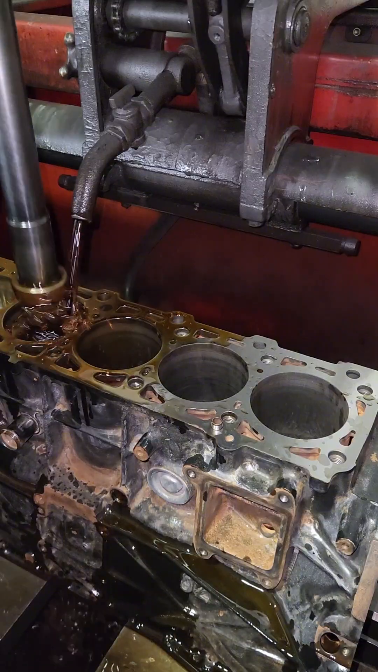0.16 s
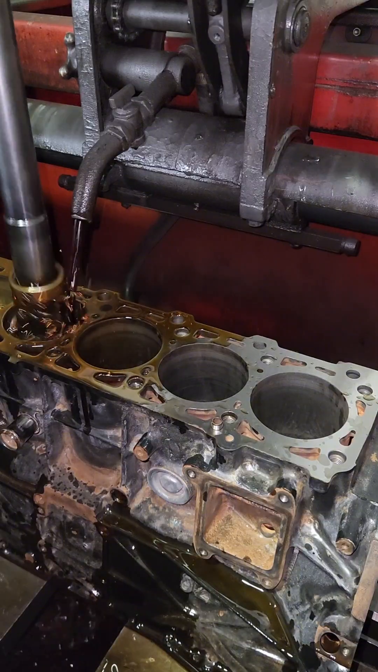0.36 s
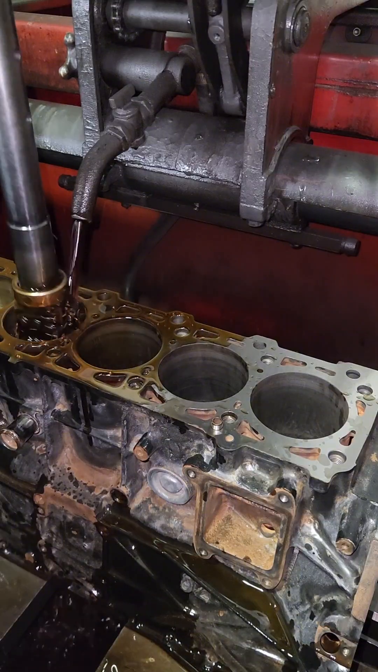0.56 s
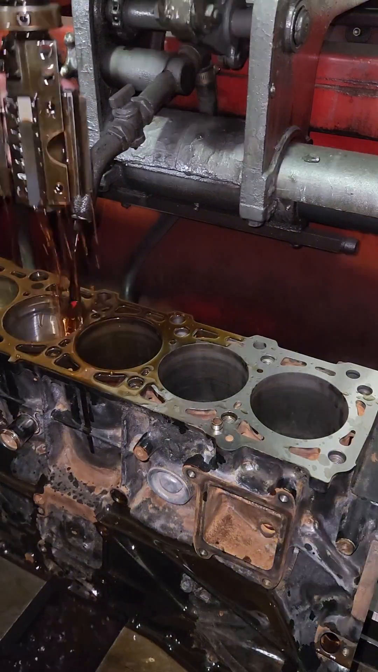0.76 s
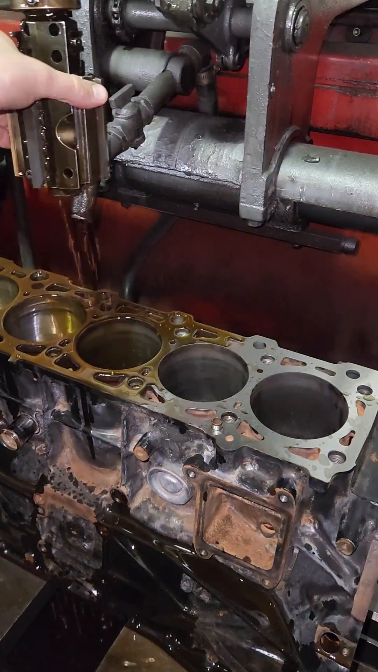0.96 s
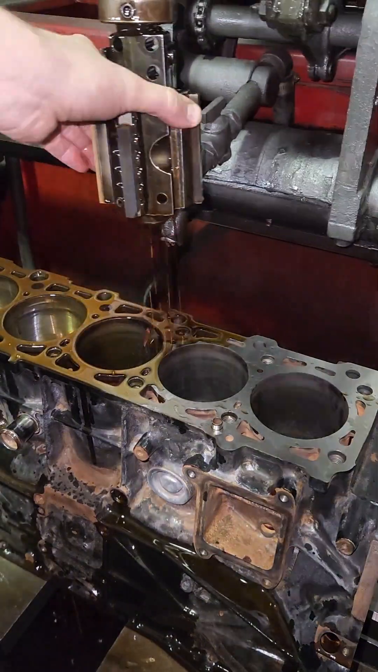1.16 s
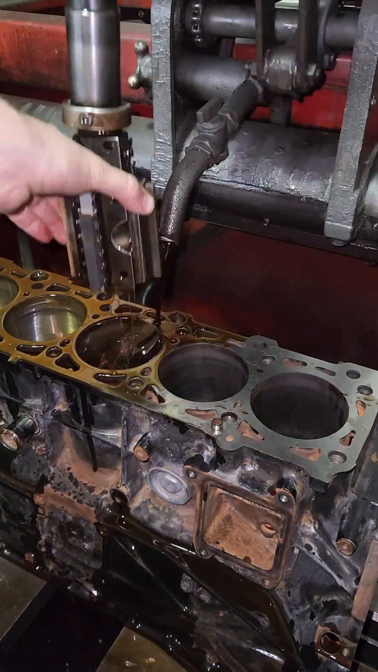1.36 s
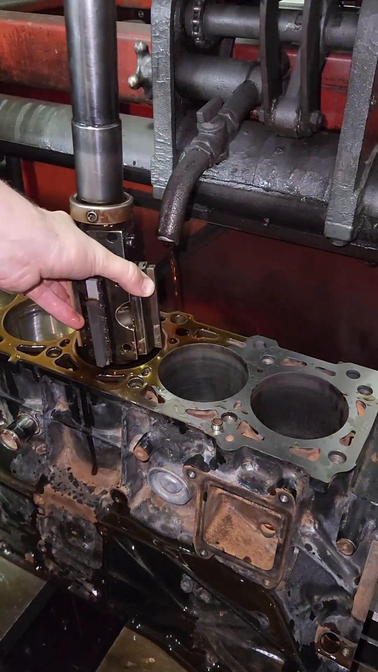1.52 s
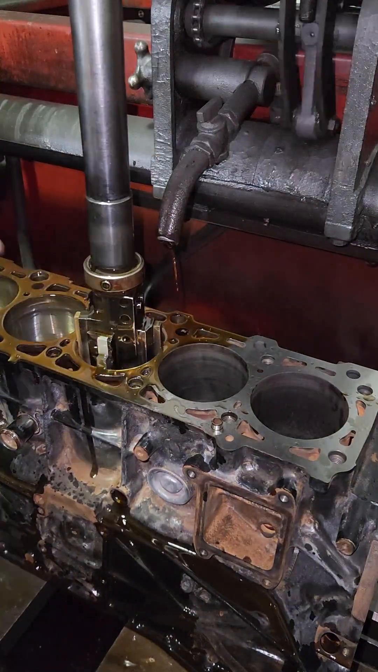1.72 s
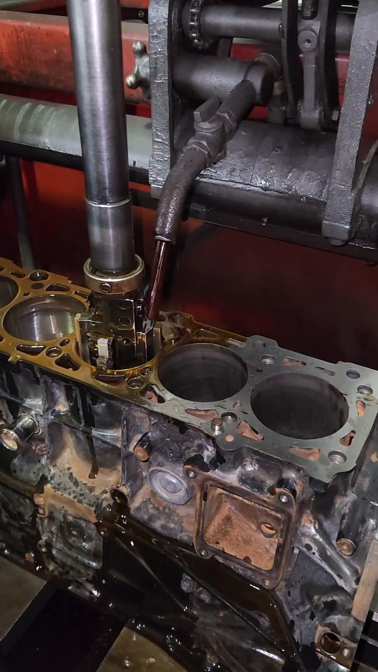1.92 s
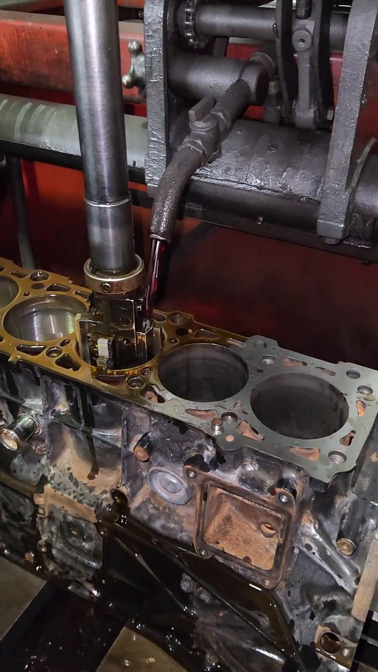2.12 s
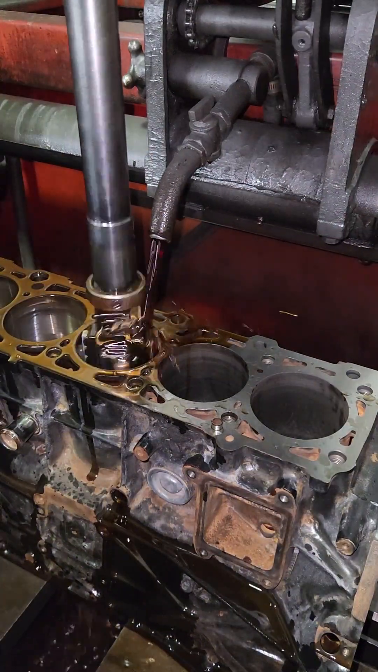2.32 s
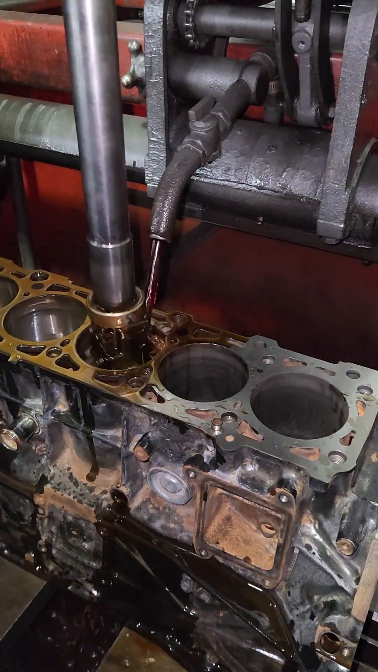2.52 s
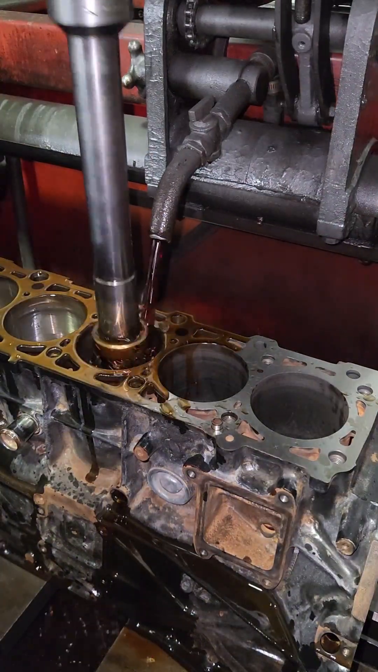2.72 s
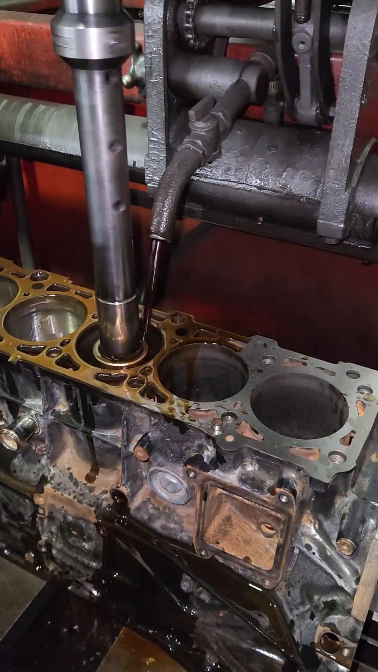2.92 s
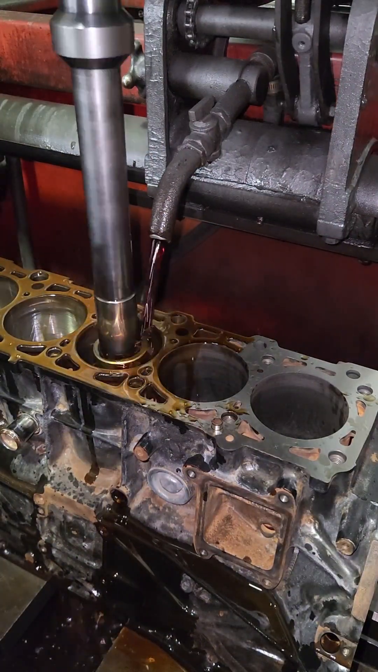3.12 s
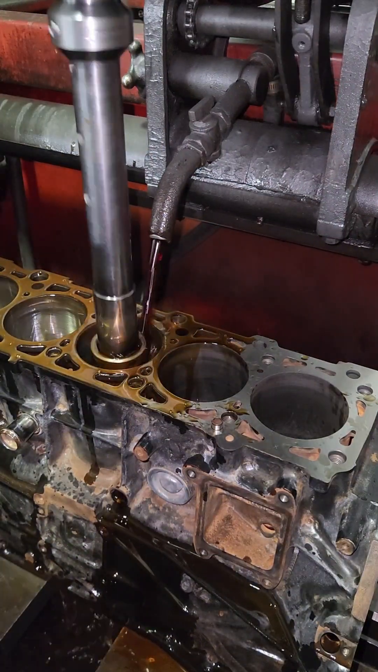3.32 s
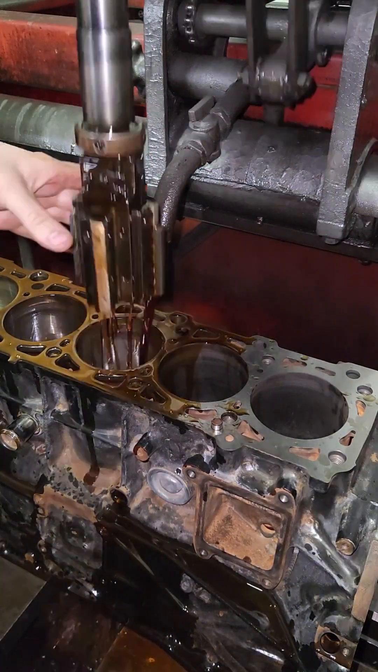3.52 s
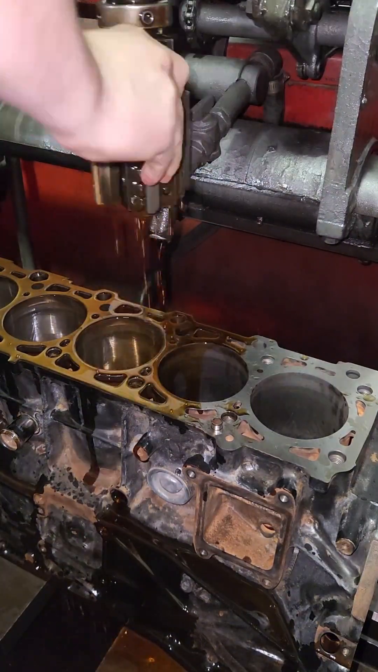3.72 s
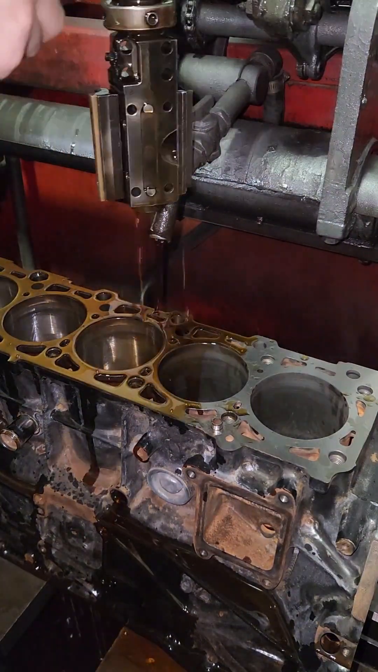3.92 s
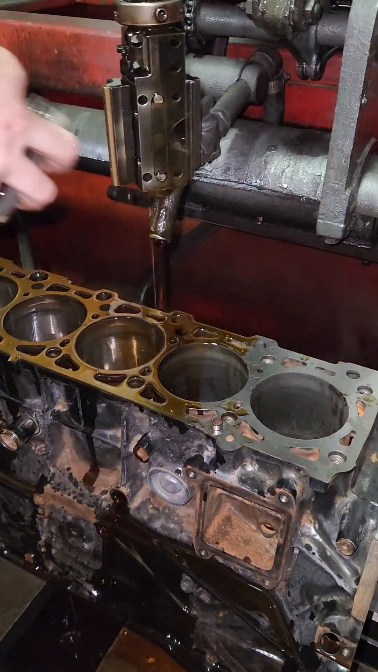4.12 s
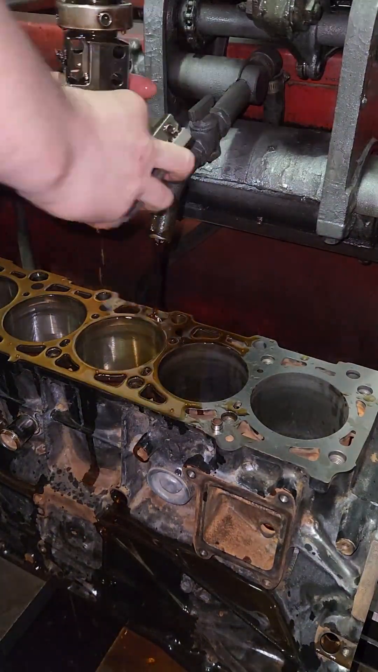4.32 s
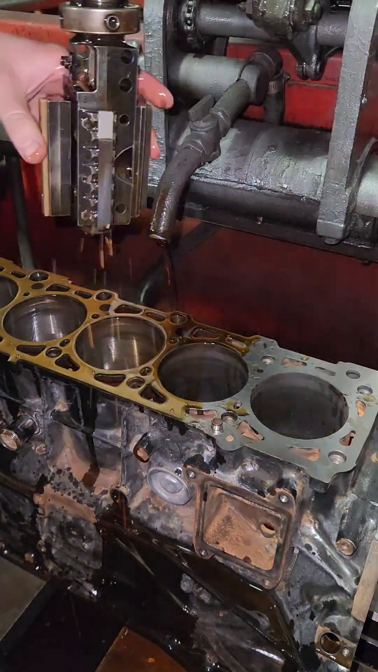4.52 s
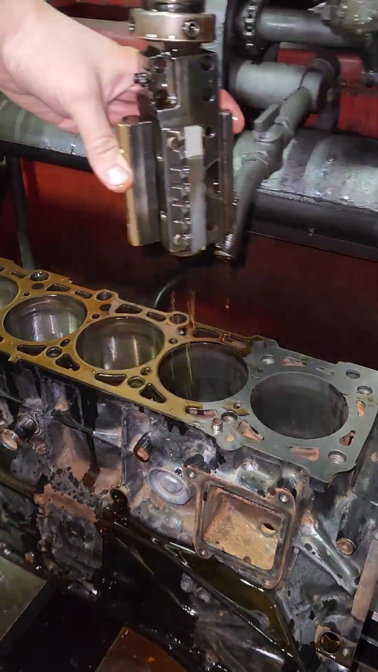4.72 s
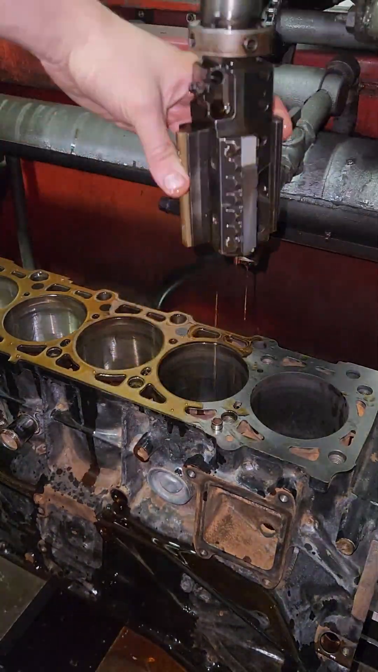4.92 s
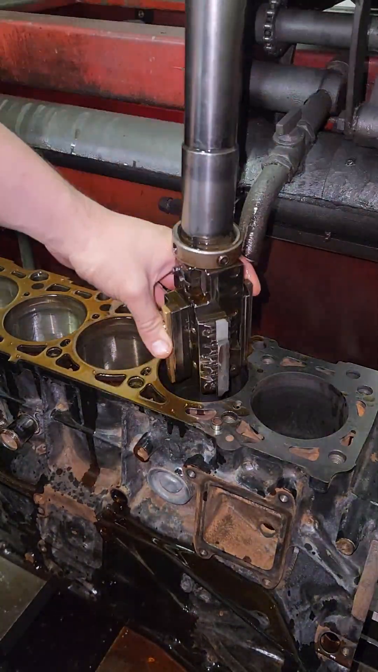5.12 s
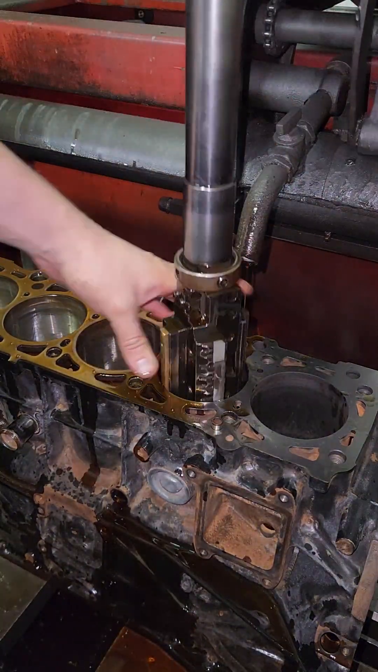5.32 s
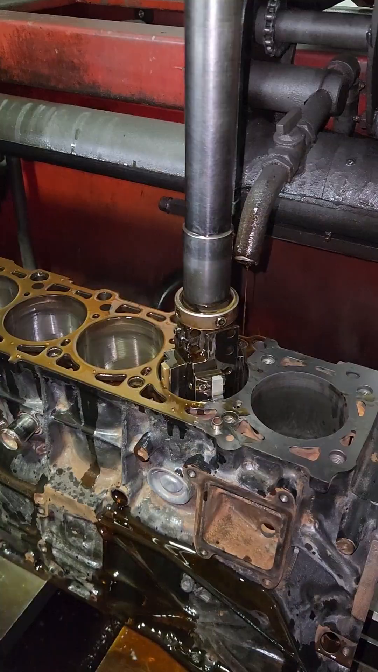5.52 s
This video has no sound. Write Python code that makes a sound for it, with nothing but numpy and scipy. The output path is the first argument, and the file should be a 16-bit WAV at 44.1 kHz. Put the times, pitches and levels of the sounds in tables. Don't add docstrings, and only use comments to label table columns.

```python
import sys
import numpy as np
from scipy import signal
from scipy.fft import rfft, irfft, next_fast_len
from scipy.io import wavfile
from scipy.ndimage import uniform_filter1d

SR = 44100
rng = np.random.default_rng(int(sys.argv[2]) if len(sys.argv) > 2 else 0)


def unload_wav(signal):
    wavfile.write(
        sys.argv[1],
        SR,
        np.round(np.clip(np.atleast_2d(signal).T, -1, 1) * 32767).astype(np.int16),
    )


def nominal_scale(level):
    x = np.asarray(level, float) / 20
    return 10 ** x


N = 245195

SECONDS = np.arange(N) / SR
MOMENTS = np.arange(0, N + 32, 32) / SR
LEAD_IN = 128
SHAFT_HZ = 39.1
# frequency in Hz, level in dB per Hz.
PANEL_BODY = [(71, -20), (120, 3.5), (285, -2.5), (352, -3), (445, -5.5), (1140, -11.5), (1490, -11),
              (1650, -14.5), (1840, -16), (2300, -23.5), (2990, -67), (5060, -120)]
# frequency in Hz, level in dB per Hz.
SPRAY = [(5290, -13.5), (9000, -25), (9620, -11), (10300, -3.5), (11100, -2), (12000, 5), (13200, 3),
         (15100, 1), (16300, -13)]
# frequency in Hz, level in dB per Hz.
CRACK = [(530, -2), (900, 0), (1930, -8.5), (2500, -4.5), (3370, -3.5), (4540, -13), (5300, -5.5),
         (6550, -13.5), (7800, -20), (9600, -33), (11700, -66), (19800, -120)]


def evened(x):
    return x / np.sqrt(np.mean(x ** 2) + 1e-20)


def peaked(x, db):
    return nominal_scale(db) * x / abs(x).max()


def read(points, hz):
    f, value = np.transpose(points)
    return np.interp(np.log(hz + 1), np.log(f + 1), value)


def colour(x, points):
    hz = np.fft.rfftfreq(x.shape[1], 1 / SR)
    return irfft(rfft(x) * nominal_scale(read(points, hz)), x.shape[1])


def resonate(x, hz, width):
    return signal.lfilter(*signal.iirpeak(min(hz, .45 * SR), hz / width, SR), x)


def narrow(x, hz, width):
    return evened(resonate(resonate(x, hz, width), hz, width))


def fuzz_band(hz, width):
    return narrow(rng.standard_normal((2, N)), hz, width)


def noise(points, patchy_db, flicker_db, size):
    frames = 4 * N // size + 5
    hz = np.fft.rfftfreq(size, 1 / SR)
    z = rng.standard_normal((frames, len(hz), 5)).T
    patches = evened(uniform_filter1d(uniform_filter1d(z[4], size=9, axis=0), size=7, axis=1))
    flicker = evened(uniform_filter1d(rng.standard_normal(frames), size=3))
    gain = nominal_scale(read(points, hz)[:, None] + patchy_db * patches + flicker_db * flicker)
    spectra = (z[:2] + 1j * z[2:4]) * gain
    return evened(signal.istft(spectra, nperseg=size, noverlap=3 * size // 4)[1][:, :N])


def wander(size):
    coarse = rng.standard_normal((2, N // 32 + 2))
    coarse = uniform_filter1d(uniform_filter1d(coarse, size=size), size=size)
    return evened(np.array([np.interp(np.arange(N) / 32, np.arange(len(row)), row) for row in coarse]))


def tone(hz, stray_hz, throb_db, orders=((1, 0),), bend=((0, 1), (1, 1))):
    # time in seconds, share of full speed.
    motor_speed = [(0, 1), (.655, 1), (.7, .88), (1.8, .95), (1.92, 1), (3.45, 1), (3.53, .88), (5.44, .95),
                   (5.56, 1)]
    speed = np.interp(SECONDS, *np.transpose(motor_speed)) * np.interp(SECONDS, *np.transpose(bend))
    turns = np.cumsum(hz * speed + stray_hz * wander(size=16), axis=1) / SR
    chord = sum(nominal_scale(db) * np.sin(2 * np.pi * k * turns) for k, db in orders)
    return evened(nominal_scale(throb_db * wander(size=22)) * chord)


def running(db, rise_s, lag_s, fall_db_per_s, bite_db=0., wait_s=0., feed_s=0.96):
    # switched on in seconds, switched off in seconds.
    spells = [
        (-1.0, .67),
        (1.806, 3.47),
        (5.443, 7.0),
    ]
    power = 0
    for (on, off), level_db in zip(spells, np.broadcast_to(db, len(spells))):
        since = np.maximum(MOMENTS - on - wait_s, 0)
        unfed_db = bite_db * np.maximum(1 - since / feed_s, 0)
        coasted_db = fall_db_per_s * np.maximum(MOMENTS - off - lag_s, 0)
        rise = 1 - np.exp(-since / max(rise_s, 1e-3))
        power = power + (rise * nominal_scale(level_db - unfed_db - coasted_db)) ** 2
    return np.sqrt(power)


def swells(rows):
    return [nominal_scale(db - 10 * abs(MOMENTS - s) / fade_s) for s, db, fade_s in rows]


def together(*gains):
    return np.interp(SECONDS, MOMENTS, np.sqrt(sum(np.square(g) for g in gains)))


def boom_level():
    # time in seconds, level in dB, seconds to fade 10 dB either side.
    shoves = [
        (1.285, -30, 0.07),
        (1.45, -33.5, 0),
        (1.57, -30, 0.07),
        (1.755, -29, 0.1),
        (4.11, -33, 0),
        (4.28, -33, 0.12),
        (4.52, -39, 0.2),
        (4.71, -29, 0.05),
        (5.38, -33, 0.07),
    ]
    return together(running(db=-19.0, rise_s=0.01297, lag_s=0.16, fall_db_per_s=31.0), nominal_scale(-43.5), *swells(shoves))


def body_level():
    # time in seconds, level in dB, seconds to fade 10 dB either side.
    rattles = [
        (1.09, -37, .05),
        (4.7, -41, .04),
    ]
    load = running(db=-23.5, rise_s=0.00731, lag_s=0.0028, fall_db_per_s=130, bite_db=5.0)
    lurch = running(db=-45.5, rise_s=.006, lag_s=0., fall_db_per_s=100, bite_db=-21, feed_s=.12)
    return together(load, lurch, nominal_scale(-43.8), *swells(rattles))


def coast_level():
    return together(running(db=-35, rise_s=.012, lag_s=0.031, fall_db_per_s=12.5))


def frame():
    # frequency in Hz, level in dB per Hz.
    rumble = [(11, -40), (18, -13.5), (81, 3), (98, -1.5), (129, -15), (170, -19), (220, -35), (370, -120)]
    # multiple, level in dB.
    orders = [(1, -13), (2, 0.5), (3, -8.5)]
    # frequency in Hz, gain in dB.
    coasting = [(60, 0), (900, 0), (1300, -4), (2000, -9), (5000, -9)]
    shaft = tone(SHAFT_HZ, stray_hz=4.51, throb_db=2.0, orders=orders)
    pushes = 1 + 0.25 * tone(1.02 * SHAFT_HZ, stray_hz=1.5, throb_db=1.5)[0]
    boom = evened(pushes * noise(rumble, patchy_db=2.5, flicker_db=0.0, size=4096) + 0.38 * shaft)
    swell = abs(uniform_filter1d(uniform_filter1d(boom[0] ** 2, size=1500), size=1500))
    boom = evened(boom / (swell + .05) ** 0.34)
    body = noise(PANEL_BODY, patchy_db=1.5, flicker_db=0.5, size=512)
    coast = colour(body[:, ::-1], coasting)
    return boom_level() * boom + nominal_scale(-2.5) * (body_level() * body + coast_level() * coast)


def whine(hz, width, beat, fuzz, throb_db, stray, bend=((0, 1), (1, 1))):
    shaft = 1.5 + beat * tone(SHAFT_HZ, stray_hz=3.6, throb_db=7.5)[0]
    core = tone(hz, stray_hz=stray * width, throb_db=throb_db, bend=bend)[0]
    return evened(shaft * core + fuzz * fuzz_band(hz, 4.2 * width))


def gears():
    # time in seconds, share of pitch.
    hum_drift = [(0, 1.02), (.35, .97), (.62, 1.02), (1.82, .95), (2.08, 1), (2.45, 1), (2.8, 1.035),
                 (3.1, .98), (3.45, 1.01)]
    # time in seconds, share of pitch.
    stroke_load = [(0, 1.008), (.08, .992), (.2, 1.016), (.34, .985), (.48, 1.01), (.62, 1.018), (1.9, 1),
                   (2.0, .992), (2.3, .995), (2.44, 1.01), (2.7, 1.002), (2.85, .992), (2.95, 1.008),
                   (3.18, .992), (3.3, 1), (3.46, .99)]
    # time in seconds, level in dB.
    lowering = [(1.15, -62), (1.378, -45), (1.54, -54), (1.572, -42.5), (1.592, -59), (1.68, -52)]
    hum_db = (-32.5, -29.5, -30)
    low_db = (-32, -46.5, -47)
    loose_db = (-41, -40, -46)
    high_db = (-35.5, -33.5, -41)
    hum_level = together(running(hum_db, rise_s=0.0042, lag_s=-0.02, fall_db_per_s=251.5))
    low_level = together(running(low_db, wait_s=.06, rise_s=.04, lag_s=-.01, fall_db_per_s=400))
    loose_level = together(running(loose_db, wait_s=.05, rise_s=.04, lag_s=.0, fall_db_per_s=300))
    high_level = together(running(high_db, wait_s=.07, rise_s=.03, lag_s=-.01, fall_db_per_s=400))
    hum = hum_level * whine(356, 24, beat=0.5, fuzz=0.85, throb_db=1.8, stray=.36, bend=hum_drift)
    low = low_level * whine(1314, 18, beat=0.19, fuzz=0.4, throb_db=1.5, stray=.45)
    loose = loose_level * fuzz_band(1314, 86)
    high = high_level * whine(1646, 38, beat=0.63, fuzz=1.2, throb_db=2.2, stray=.52, bend=stroke_load)
    top = high_level * nominal_scale(-16) * fuzz_band(1980, 44)
    whirr = nominal_scale(np.interp(SECONDS, *np.transpose(lowering), -120, -120)) * fuzz_band(1590, 380)
    return hum + low + loose + high + top + whirr


def hiss_level():
    # time in seconds, level in dB, seconds to fade 10 dB either side.
    slops = [
        (0.79, -34, 0.02),
        (1.27, -46.5, 0.5),
        (1.79, -43, 0.1),
        (3.99, -44.5, 0.27),
        (4.6, -46, 0.2),
        (4.72, -42.5, 0.1),
        (4.85, -45.5, 0.16),
        (5.42, -37.5, 0.1),
    ]
    stones = running(db=-30.0, rise_s=0.029, lag_s=-0.023, fall_db_per_s=77, bite_db=6.0)
    draining = running(db=-41, rise_s=0.00645, lag_s=0.12, fall_db_per_s=8.0)
    return together(stones, draining, nominal_scale(-47.5), *swells(slops))


def add(mix, s, sound):
    part = mix[:, round(s * SR):][:, :sound.shape[1]]
    part += sound[:, :part.shape[1]]


def bubbles():
    count = round(90 * N / SR)
    t = np.arange(400) / SR
    out = np.zeros((2, N))
    for when, small, left, right in rng.random((count, 4)):
        hz = 1800 * 3.61 ** small
        blip = np.sin(2 * np.pi * hz * t * (1 + 9 * t)) * (1 - np.exp(-t / .0006)) * nominal_scale(-60 * t / 0.0086)
        distance = np.array([[left + .05], [right + .05]])
        add(out, when * N / SR, blip / distance ** 0.39)
    return evened(out)


def oil_drops():
    size = nominal_scale(6.9 * np.minimum(rng.exponential(1, N), 2.8)) * (rng.random(N) < 350 / SR)
    splash = signal.oaconvolve(size, nominal_scale(-60 * np.arange(900) / SR / 0.011))[:N]
    return evened(splash * rng.standard_normal((2, N)))


def hone():
    # frequency in Hz, level in dB per Hz.
    hiss = [(1260, -40), (2150, -1), (2550, 0), (2980, 0), (3930, -1), (5160, -1.5), (5630, -3.5),
            (7540, -3), (9320, -17.5), (10500, -17.5), (13600, -36), (22000, -120)]
    # frequency in Hz, level in dB per Hz.
    trickle = [(880, -12), (1500, -21), (1900, -10), (2850, -1), (4290, 1.5), (4610, -1.5), (7400, -8.5),
               (9070, -23), (10500, -28), (13600, -56), (22000, -120)]
    drops = oil_drops()
    level = hiss_level()
    cutting = np.clip(level / nominal_scale(-37.5), 0, 1) ** 2
    stones = noise(hiss, patchy_db=0.5, flicker_db=1.0, size=256) + nominal_scale(-10.0) * evened(colour(drops, hiss))
    oil = noise(trickle, patchy_db=3.0, flicker_db=1.0, size=256) + nominal_scale(-8.0) * bubbles()
    spray = noise(SPRAY, patchy_db=1.0, flicker_db=-0.5, size=256) + nominal_scale(-6.5) * evened(colour(drops, SPRAY))
    flung = together(running(db=-48.5, rise_s=.01, lag_s=.03, fall_db_per_s=100))
    spray_level = np.hypot(nominal_scale(-43.5) * (level / nominal_scale(-30)) ** 1.43, flung)
    wet_hiss = np.sqrt(cutting) * stones + np.sqrt(1 - cutting) * oil
    return nominal_scale(-4.5) * level * wet_hiss + spray_level * spray


def strike_time():
    return np.maximum(np.arange(4096) - LEAD_IN, 0) / SR


def blow(t60, rise_s, snap=0.):
    t = strike_time()
    room = nominal_scale(-23.5 - 60 * t / 0.32) * (1 - t / t[-1])
    decay = nominal_scale(-60 * t / max(t60, .004)) + room + snap * nominal_scale(-60 * t / 0.0047)
    return (1 - np.exp(-t / max(rise_s, 1e-5))) * decay * rng.standard_normal((2, len(t)))


def metal(spectrum, db, hz, t60, sheen_db, rise_ms, snap=0., glint_hz=10500):
    # pitch in Hz, level in dB, t60 in seconds.
    modes = [(2280, -1, 0.12), (3400, 4, 0.021), (4160, -1, 0.15), (4710, 3, 0.065), (5200, 2, 0.063)]
    burst = blow(t60, rise_ms / 1000, snap)
    ring = sum(nominal_scale(d) * narrow(burst, f, 3.5 / np.clip(r, .01, .045)) for f, d, r in modes)
    crack = evened(colour(burst, spectrum)) + 0.76 * narrow(burst, hz, .5 * hz) + 0.22 * evened(ring)
    sheen = evened(colour(burst, SPRAY)) + 1.2 * narrow(burst, glint_hz, 900)
    return peaked(crack, db) + peaked(sheen, db + sheen_db)


def play(mix, rows, strike, lift_db):
    for s, db, *rest in rows:
        add(mix, s - LEAD_IN / SR, strike(db + lift_db, *rest))


def squeak(db, hz, t60):
    burst = blow(t60, rise_s=.0008, snap=.8) * nominal_scale(-60 * np.arange(4096) / SR / .25)
    return peaked(narrow(burst, hz, 1100) + .35 * narrow(burst, 1.0697 * hz, 2500), db)


def stone_squeaks(mix):
    # start in seconds, peak in dB, pitch in Hz, t60 in seconds.
    high_rings = [(0.003, -30, 15000, .03), (2.538, -31, 15700, .06), (2.666, -30, 15700, .04),
                  (2.773, -28, 15500, .04), (2.7845, -20, 15300, .03), (2.4215, -21.5, 15700, 0.068),
                  (2.4354, -22, 15700, 0.045), (2.5506, -17, 15600, 0.04), (2.6738, -21, 15600, 0.03),
                  (2.7802, -13.5, 15250, 0.02)]
    play(mix, high_rings, squeak, lift_db=4.5)


def tap(db, hz, t60):
    burst = blow(t60, rise_s=0.0013)
    return peaked(narrow(burst, hz, 0.8 * hz) + .25 * evened(colour(burst, CRACK)), db)


def rim_taps(mix):
    # start in seconds, peak in dB, centre in Hz, t60 in seconds.
    contacts = [(1.7205, -27, 1890, .03), (1.7875, -26, 1850, .06), (5.304, -41, 4200, 0.018),
                (5.318, -39, 5400, .02), (5.3592, -24, 1900, 0.024), (0.0777, -28, 3120, .02),
                (0.716, -26, 7000, .02), (2.691, -24, 2840, .02), (2.9011, -25, 3710, .02),
                (2.9195, -24, 3750, .02), (3.0303, -25, 2970, .02), (3.2607, -23, 2950, .025),
                (3.3111, -27, 3000, .02), (3.572, -30, 4200, .04), (3.676, -31, 1500, 0.028),
                (3.976, -34, 2800, .03), (3.99, -35, 4800, .04), (4.043, -34, 5500, .03),
                (4.064, -34, 5800, .03), (5.381, -21, 900, .03), (5.452, -19, 750, .04),
                (4.4652, -28, 1900, .012), (4.8894, -42, 3200, .02), (5.03, -30, 2800, .022),
                (0.857, -36, 1400, .03), (0.92, -36, 2600, .03), (4.3935, -26, 2000, .015)]
    play(mix, contacts, tap, lift_db=3.5)


def turn(db, t60):
    return metal(CRACK, db, 4120, t60, sheen_db=-14, rise_ms=1.55)


def head_turns(mix):
    # start in seconds, peak in dB, t60 in seconds.
    reversals = [(0.170, -16, 0.043), (0.3568, -16.5, 0.035), (0.364, -15.5, .04), (0.5576, -16, .03),
                 (0.573, -21, .025), (2.5038, -13, .022), (2.5227, -17, 0.019), (2.7496, -15, 0.02),
                 (2.9648, -14.5, 0.03), (3.1628, -14.5, 0.025), (3.357, -18, .05), (3.5542, -29, .025)]
    # start in seconds, peak in dB,
    # t60 in seconds.
    returns = [
        (0.164, -22, .025),
        (2.7689, -22.5, 0.02),
        (2.9755, -16.5, .03),
        (3.1719, -15, 0.031),
        (3.372, -16, 0.033),
    ]
    play(mix, reversals, turn, lift_db=3.5)
    play(mix, returns, turn, lift_db=3.5)


def thud(db, hz, t60):
    t = strike_time()
    envelope = (1 - np.exp(-t / 0.0019)) * nominal_scale(-60 * t / max(t60, .01)) * (1 - t / t[-1])
    swing = evened(np.sin(2 * np.pi * hz * t) * envelope)
    puff = blow(t60, rise_s=0.0014)
    above = evened(colour(puff, PANEL_BODY))
    return peaked(swing + 0.62 * narrow(puff, 1.36 * hz, 1.97 * hz) + 0.046 * above, db)


def frame_thuds(mix):
    # start in seconds, peak in dB, pitch in Hz, t60 in seconds.
    gear_bumps = [(0.299, -26, 694, 0.101), (0.505, -21, 573, 0.065), (0.625, -25, 886, 0.0445),
                  (2.201, -26, 690, 0.049), (2.448, -19, 730, 0.041), (2.692, -22, 460, 0.05),
                  (2.922, -19, 550, 0.04775), (3.136, -22.5, 549, 0.064), (3.31, -23, 657, 0.0898),
                  (3.374, -21, 684, 0.049), (3.4745, -26, 1210, 0.061), (3.51, -20.5, 514, 0.028)]
    # start in seconds, peak in dB, pitch in Hz, t60 in seconds.
    frame_bumps = [(0.702, -33, 143, .08), (0.792, -30.5, 217, .051), (0.859, -29.5, 179, .072),
                   (0.996, -30, 1150, .03), (1.074, -19.5, 199, .06), (1.109, -22.5, 260, 0.072),
                   (1.5702, -37, 1720, 0.022), (1.515, -31.5, 143, .08), (1.719, -21, 144.3, .041),
                   (1.7475, -16, 285, 0.07), (1.797, -25, 310, .05), (1.812, -23, 425, 0.0516),
                   (1.8235, -9.5, 320, .09), (1.8265, -9, 130, 0.17), (1.752, -20, 420, .06),
                   (2.409, -14, 166, 0.067), (2.685, -16.5, 315, 0.095), (3.709, -20, 140, 0.0806),
                   (4.027, -28, 140, 0.079), (4.086, -30.5, 145, .08), (4.141, -33, 150, .068),
                   (4.681, -28, 155, 0.097), (4.719, -32.5, 143, .087), (5.3185, -22.5, 280, 0.032),
                   (5.3625, -15, 191, 0.045), (5.384, -17, 330, .063), (5.41, -23, 330, 0.08),
                   (5.4445, -11, 90, 0.12), (5.4495, -14, 190, .08), (5.461, -15, 360, 0.14),
                   (0.978, -30, 380, .03), (1.156, -31, 350, .03), (3.672, -34, 800, .035),
                   (3.713, -33, 800, .04)]
    # start in seconds, peak in dB, pitch in Hz, t60 in seconds.
    jolts = [
        (1.27, -31, 150, .12),
        (1.35, -32, 160, .12),
        (1.43, -32, 150, .12),
        (2.83, -20, 270, .07),
    ]
    for rows in (gear_bumps, frame_bumps, jolts):
        play(mix, rows, thud, lift_db=2.5)


def clack(db, hz, t60, rise_ms):
    return metal(CRACK, db, hz, t60, sheen_db=-16 + 0.55 * db, rise_ms=rise_ms, glint_hz=12360)


def switches(mix):
    # start in seconds, peak in dB, centre in Hz, t60 in seconds, rise in ms.
    latches = [(0.625, -18, 3960, .022, 1.793), (0.7038, -16, 5230, 0.019, 1.2),
               (0.7482, -27.5, 3900, .03, 2), (0.853, -30, 4012, 0.03223, 2.2),
               (1.048, -33, 3200, 0.0512, 2.2), (1.7476, -10, 5300, .026, .8),
               (1.8036, -19, 7000, 0.03, 1.5), (1.8062, -14, 4760, 0.03, 2),
               (2.1904, -24.5, 5220, .029, 1.8), (2.4488, -23, 2280, 0.03323, 2),
               (3.4526, -31, 2840, .04, 2), (3.786, -34, 4250, .04, 2), (3.8626, -32, 4830, .04, 2.2),
               (4.0528, -34, 5230, .043, 2.5), (4.241, -32.5, 3600, .06, 4),
               (5.3812, -11.5, 2300, 0.026, 1.1), (5.3788, -12, 5340, 0.026, 1.5),
               (5.4062, -17.5, 5370, 0.02, 1.8), (5.4415, -26, 6600, 0.034, 2.2)]
    play(mix, latches, clack, lift_db=3.5)


def drip(db):
    # frequency in Hz, level in dB per Hz.
    splash = [(3000, -40), (5000, 0), (7500, 6.5), (9500, -12), (12000, 1.5), (16000, -8)]
    return peaked(colour(blow(0.026, rise_s=0.004), splash), db)


def oil_drips(mix):
    # start in seconds, peak in dB.
    landings = [(0.9487, -43), (0.9801, -44.5), (1.0904, -39.5), (1.1104, -39), (1.1777, -44),
                (1.2615, -43), (1.5364, -41), (3.5623, -36.5), (3.6267, -35.5), (3.6491, -44), (3.691, -40),
                (3.7494, -34), (3.8097, -36), (3.904, -41.5), (3.9529, -41), (3.9823, -36.5),
                (4.0113, -36.5), (4.0532, -36), (4.0866, -39), (4.2018, -38), (4.2398, -40), (4.362, -44),
                (4.3924, -37), (4.4643, -37), (4.6957, -42), (4.7845, -41.5), (4.9137, -45.5),
                (5.1023, -52), (5.2205, -46), (5.2505, -39.5), (3.775, -41), (3.852, -43), (3.964, -41),
                (4.066, -39), (4.118, -43), (4.5657, -45), (4.5851, -43), (4.716, -45), (4.7642, -45),
                (4.8081, -47), (4.8296, -46), (4.872, -45), (4.9822, -47), (5.1533, -48), (5.1833, -50),
                (5.2382, -46)]
    play(mix, landings, drip, lift_db=4.5)


def knock(db, hz, t60):
    # frequency in Hz, level in dB per Hz.
    crisp = [(710, -34), (1200, -12), (2110, -1.5), (3030, -3), (4300, 2), (5200, -2), (5900, -9),
             (7230, -8), (9000, -25), (11700, -65), (19800, -120)]
    return metal(crisp, db, hz, t60, sheen_db=-35, rise_ms=0.19, snap=1.4)


def holder_knocks(mix):
    # start in seconds, peak in dB, centre in Hz, t60 in seconds.
    loose_holders = [(1.0735, -33, 2900, .03), (4.4735, -28, 4300, .03), (3.7107, -29, 2250, .035),
                     (3.9494, -33.5, 5040, .027), (4.1874, -25.5, 4200, 0.035),
                     (4.1994, -20.5, 3400, 0.031), (4.311, -34, 6500, .02), (4.3192, -21, 5040, 0.032),
                     (4.3888, -24, 2300, .012), (4.3928, -19, 3700, 0.024), (4.4095, -21, 2545, .018),
                     (4.4648, -10.5, 3500, 0.017)]
    # start in seconds, peak in dB, centre in Hz, t60 in seconds.
    bounces = [
        (1.7495, -9, 3000, .015),
        (1.756, -19, 3300, .03),
        (4.2025, -26, 4900, .03),
        (4.3215, -25, 5000, .035),
        (4.4795, -29, 4300, .03),
        (5.3836, -13.5, 3200, 0.014),
        (5.392, -23, 2500, .02),
        (5.4075, -19, 3200, .015),
        (5.431, -30, 5200, .06),
    ]
    play(mix, loose_holders, knock, lift_db=5.5)
    play(mix, bounces, knock, lift_db=3.5)


def scene():
    mix = frame() + gears() + hone()
    for strikes in (stone_squeaks, rim_taps, head_turns, frame_thuds, switches, oil_drips, holder_knocks):
        strikes(mix)
    return mix


def band_limit(x):
    return signal.sosfilt(signal.butter(12, 17000, fs=SR, output="sos"), x)


def record(dry):
    # frequency in Hz, likeness from 0 to 1.
    likeness = [(60, 1), (130, 0.98), (290, 1), (640, 0.574), (1400, 0.11), (3100, 0.7), (6800, .1),
                (15000, 0.287)]
    # frequency in Hz, phase in radians by which the left port leads.
    left_lead = [(30, -0.022), (80, -0.063), (250, 0.3226), (700, 0.27), (1300, -1.3), (1650, -0.63),
                 (3000, -1.66), (15000, -1.2)]
    # frequency in Hz, dB by which the left port is louder.
    left_louder = [(60, 2), (110, 0.5), (200, 2.5), (380, 3), (700, 3), (1290, 3.5), (2380, 1.5), (4400, 2),
                   (8120, 17.5), (15000, 11.5)]
    ceiling, edge_hz = .86, 15830
    size = next_fast_len(N + 2048)
    hz = np.fft.rfftfreq(size, 1 / SR)
    a, b = rfft(dry, size)
    same = np.clip(read(likeness, hz), -1, 1)
    lead = read(left_lead, hz)
    tilt_db = read(left_louder, hz) / 2
    left, right = nominal_scale(tilt_db), nominal_scale(-tilt_db)
    mid = np.sqrt(left ** 2 + right ** 2 + 2 * same * left * right * np.cos(lead)) / 2
    left_port = left * a * np.exp(1j * lead)
    right_port = right * (same * a + np.sqrt(1 - same ** 2) * b)
    ports = irfft(np.array([left_port, right_port]) / mid, size)
    limited = rfft(np.clip(ports, -ceiling, ceiling)) / np.sqrt(1 + (hz / edge_hz) ** 400)
    return band_limit(irfft(limited, size)[:, :N])


dry = scene()
out = record(dry)
unload_wav(out)
```